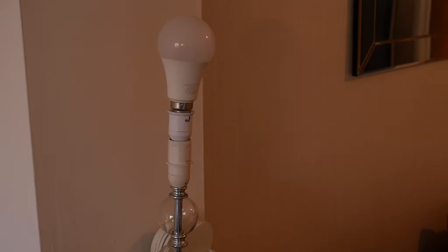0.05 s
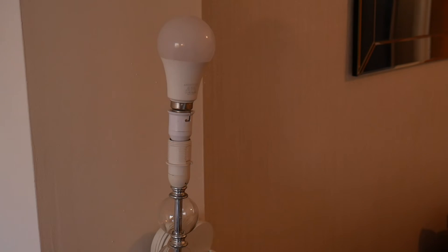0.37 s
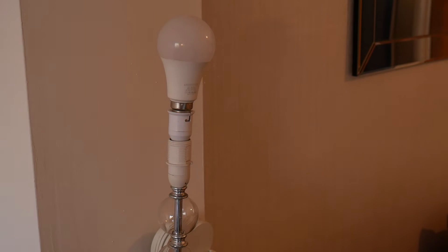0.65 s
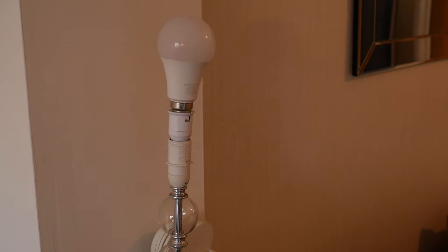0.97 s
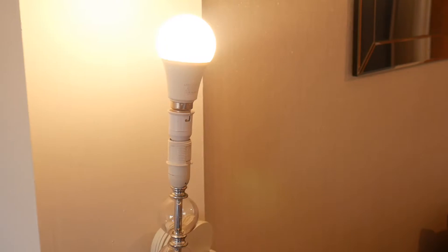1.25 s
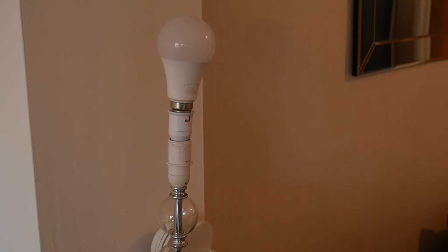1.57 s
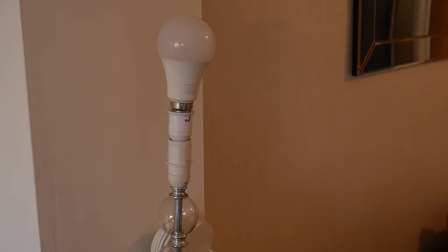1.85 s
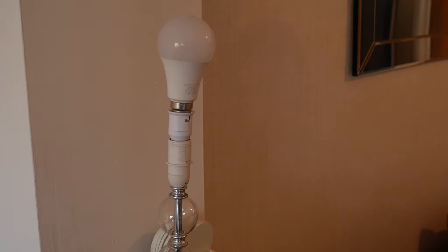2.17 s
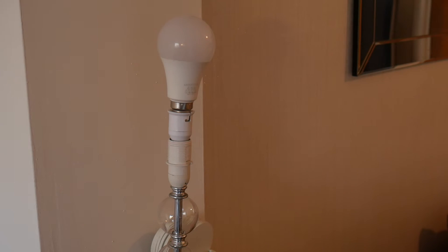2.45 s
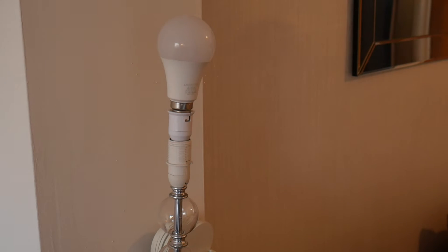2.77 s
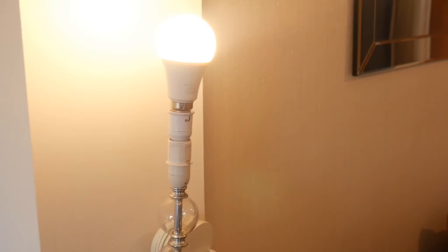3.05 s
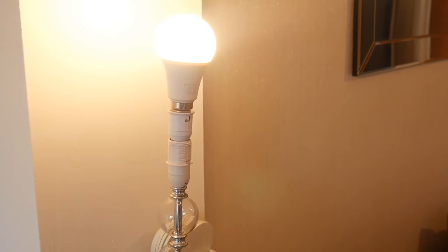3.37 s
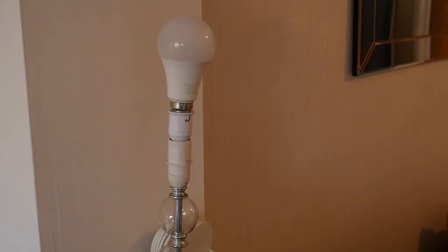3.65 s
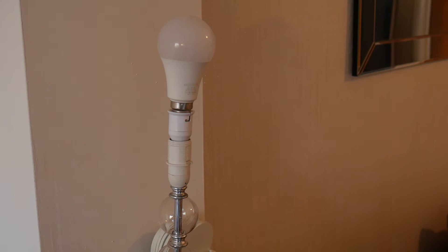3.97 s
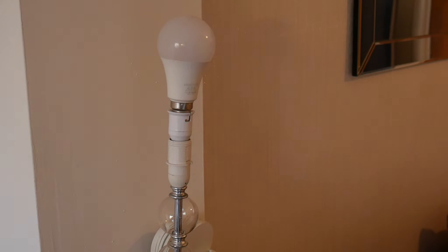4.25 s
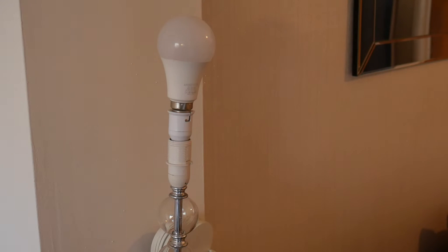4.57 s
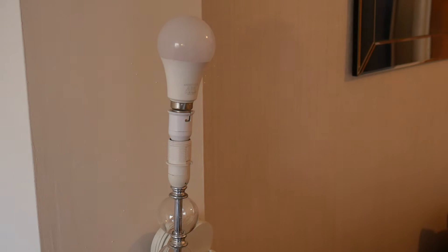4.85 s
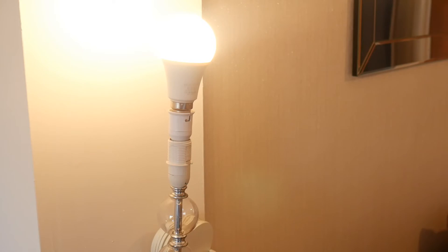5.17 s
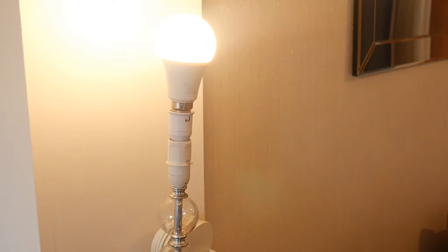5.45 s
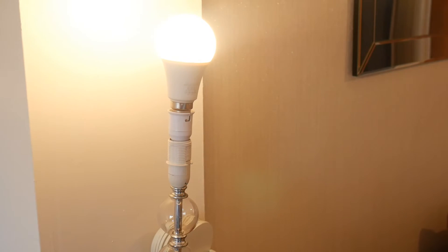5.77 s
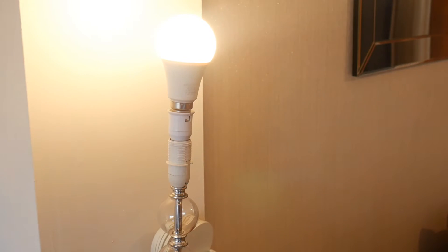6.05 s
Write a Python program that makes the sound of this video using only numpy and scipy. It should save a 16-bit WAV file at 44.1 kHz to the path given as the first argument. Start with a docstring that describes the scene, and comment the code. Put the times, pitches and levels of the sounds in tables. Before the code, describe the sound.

A plastic light switch clicks on and off five times in a bare room, with sharp snaps and a few dull wooden knocks.

```python
"""A plastic light switch is clicked on and off five times in a bare, lively room.
Each snap rings the housing and its spring, thumps as it overloads the microphone and dies away in
the room. A fingertip brushes the switch, and around each switch-off something loose and wooden
knocks and rocks to rest. Underneath lie a far clock, faint fast ticking, mains hum, a low rustle
and a hiss that swells at the end."""
import sys
import numpy as np
from scipy import signal
from scipy.fft import rfft, irfft
from scipy.io import wavfile
from scipy.ndimage import uniform_filter1d

SR = 44100
rng = np.random.default_rng(int(sys.argv[2]) if len(sys.argv) > 2 else 0)


def to_wav(s):
    """Save 16-bit WAV."""
    ch = np.atleast_2d(s).T  # columns
    pcm = np.round(np.clip(ch, -1, 1) * 32767)  # PCM
    wavfile.write(sys.argv[1], SR, pcm.astype(np.int16))


N = 269403
TIME = np.arange(N) / SR
SIZE = 2 ** 15  # samples in one hit with its tail
AGE = np.arange(SIZE) / SR
HZ = np.maximum(np.arange(SIZE // 2 + 1) * SR / SIZE, 1)


# The snaps: start_s, level_db, tilt_db_per_octave, lever_db, thump_db, wood_jolt_db, throw (on or off)
SNAPS = [(0.3379, 1.32, 0.2, -1, -2, -25.5, "on"), (1.4159, 0.6, 0.4, 0, -0.5, -19.5, "off"),
         (2.2534, 1.5, 0.0, -3, -2.5, -8.5, "on"), (3.4182, 0, 0.63, 3.5, -2.5, -4.5, "off"),
         (4.318, 0, 0.5, 4, -22.5, -13, "on")]
# Contacts inside a snap, from the spring tipping to its last bounce: offset_s, level_db, decay_s
CONTACTS = [(-0.0016, -16.5, 0.0018), (0.0, 2, 0.0014), (0.0013, 0, 0.0012), (0.0039, -7.5, 0.0015),
            (0.0055, -19, 0.0009)]
# Broad tone of the snap, per throw: pitch_hz, level_db
SNAP_COLOUR = { "on": [(100, -20), (400, -12), (950, -13), (1300, 1.5), (2200, -7.5), (3000, -0.5),
               (4200, -6), (6000, 3), (8000, 1), (10000, 4), (12000, -2), (14000, -11.5), (15500, -14)],
               "off": [(80, -13), (400, -16.5), (950, -11), (1300, -9), (2200, -2.5), (3000, 2.5),
               (4200, 3.5), (6000, 3.5), (8000, -1.5), (10000, 0.5), (12000, -5), (14000, -12),
               (15500, -16.5)]}
# Resonances of the plastic housing, per throw: pitch_hz, width_hz, boost_db
HOUSING_RESONANCES = { "on": [(1414, 170, 4.5), (1846, 310, 6), (2470, 260, 5), (3098, 220, 3),
                      (3480, 410, 8.5), (3880, 449, 7.5), (4520, 209, 6), (4890, 440, 7), (5458, 449, 2.5),
                      (6350, 180, 3), (6890, 142, 4), (7250, 100, 5), (8480, 280, 6), (9350, 310, 5),
                      (10900, 449, 3.5)], "off": [(1130, 66, 0), (1518, 350, 18.5), (3460, 550, 7),
                      (3926, 61, 1.5), (4523, 100, 3.5), (5360, 400, 4.5), (5765, 93, 4), (6200, 115, 3),
                      (6730, 490, 4.5), (7300, 197, 3.5), (7560, 130, 3), (8750, 449, 7), (9169, 155, 2.5),
                      (10900, 130, 2), (11480, 300, 1.5)]}
# Ring of the lever, per throw: pitch_hz, width_hz
LEVER_RING = {"on": (1380, 290), "off": (1560, 130)}
# Ring of the steel spring and contacts: pitch_hz, level_db, t60_s
SPRING_MODES = [(3450, 0, .3), (3770, -4.5, 0.38), (4720, -4.5, 0.33), (5700, -1.5, .4), (5700, -1, .35),
                (7060, -1, .35), (8100, -1.5, .3), (9200, 3, .3)]
# Stereo image of the snap: pitch_hz, correlation
SNAP_STEREO = [(100, -2.2), (1200, 0.3), (4500, 1), (14000, 0.75)]
# The snap sits to the left: pitch_hz, left_minus_right_db
SNAP_PAN = [(300, 3), (1300, 5), (2200, 3.5), (3300, 7.5), (4700, 3.5), (8000, 1), (13000, -0.86)]
# Dull thump of the overloaded microphones: pitch_hz, level_db
THUMP_COLOUR = [(40, -2), (120, -0.5), (280, 5.5), (650, 8.5), (1200, 0), (2400, 1), (4000, -5.5),
                (10000, -16)]
# The thump is mostly out of phase: pitch_hz, correlation
THUMP_STEREO = [(80, 0.45), (250, -1.6), (2500, -1.2)]

def switch(reverb, direct_db, room_db, spring_db):
    """The spring tips over, slams home and bounces; the housing rings differently for on and off."""
    out = np.zeros((2, N))
    lead_s = .006  # space for the contact ahead of the main hit
    pan = from_db(at_hz(SNAP_PAN, HZ) * np.array([[.5], [-.5]]))
    contact_power = 0
    for offset_s, contact_db, decay_s in CONTACTS:
        age = AGE - lead_s - offset_s
        decay = np.exp(-2 * np.clip(age / decay_s, 0, 20))
        contact_power += (age >= 0) * from_db(2 * contact_db) * decay
    for start_s, level_db, tilt, lever_db, thump_db, _, throw in SNAPS:
        resonances = [*HOUSING_RESONANCES[throw], (*LEVER_RING[throw], lever_db)]
        housing = from_db(level_db) * body(SNAP_COLOUR[throw], resonances, tilt)
        impact = irfft(rfft(crackle(np.sqrt(contact_power), SNAP_STEREO)) * pan)
        add(out, convolve(housing, impact) * from_db(direct_db), start_s - lead_s)
        add(out, convolve(housing, reverb) * from_db(room_db), start_s)
        add(out, modes(SPRING_MODES, spring_db + level_db), start_s)
        thump = convolve(body(THUMP_COLOUR), crackle(fade(0.00074), THUMP_STEREO))
        add(out, thump * from_db(thump_db), start_s)
    return out


# The hand nudges the wood: start_s, level_db
NUDGES = [(0.002, -16), (1.301, -8.5), (3.339, -12.5)]
# Let go after a switch-off, the wood rocks to rest: start_s, level_db, first_gap_s, gap_ratio
ROCKINGS = [(1.5325, 3.5, .102, .9), (3.5396, 2.5, .108, .63)]

def wood_blows(rock_count, jolt_delay_s=.016, graze_lead_s=.022, graze_db=-10, rock_loss_db=4.5):
    """Snaps jolt the wood, the hand grazes and nudges it, and it rocks ever faster and softer."""
    blows = [(start_s + jolt_delay_s, jolt_db) for start_s, *_, jolt_db, throw in SNAPS]
    for start_s, level_db in NUDGES:
        blows += [(start_s - graze_lead_s, level_db + graze_db), (start_s, level_db)]
    for start_s, level_db, gap_s, gap_ratio in ROCKINGS:
        for k in range(rock_count):
            blows.append((start_s, level_db - rock_loss_db * k ** 1.5))
            start_s += gap_s * gap_ratio ** k
    return blows


# Dull tone of a knock: pitch_hz, level_db
KNOCK_COLOUR = [(80, -35), (160, -23.5), (240, -2), (450, -6.5), (620, -3.5), (850, -10), (1150, -3),
                (1600, -18), (3000, -29.5), (8000, -55)]
# Ring of the wood: pitch_hz, level_db, t60_s
WOOD_MODES = [(226.5, 0, 0.36), (256, -3.5, .17), (340, 1, 0.41), (552, 4.5, 0.36), (586.6, -1.5, 0.47),
              (631.3, 1, 0.34), (1112, 0.5, 0.29), (1280, -2.5, 0.14)]

def wood_knocks(reverb, thud_db, ring_db, room_db, contact_s):
    """Each blow is a dull, rattly thud that sets the wood ringing and stirs the room."""
    out, wood = np.zeros((2, N)), body(KNOCK_COLOUR)
    for start_s, level_db in wood_blows(rock_count=4):
        thud = from_db(thud_db) * crackle(fade(contact_s), ROOM_STEREO)
        knock = thud + modes(WOOD_MODES, ring_db) + from_db(room_db) * reverb
        add(out, convolve(wood, knock) * from_db(level_db), start_s)
    return out


# Light touches of the finger: start_s, level_db
TOUCHES = [(0.11, 0), (1.300, -1), (2.695, 6.5), (3.313, -3.5), (4.277, 3)]
# Soft tone of a touch: pitch_hz, level_db
TOUCH_COLOUR = [(150, -13), (600, 3), (1400, -7.5), (2000, -10), (2800, 2.5), (4000, -11), (12000, -25.5)]

def finger_touches(reverb, level_db, room_db, contact_s):
    """A fingertip brushes the switch, making a short, soft scuff."""
    out, ring = np.zeros((2, N)), body(TOUCH_COLOUR)
    for start_s, touch_db in TOUCHES:
        brush = crackle(fade(contact_s), ROOM_STEREO) + from_db(room_db) * reverb
        add(out, convolve(ring, brush) * from_db(level_db + touch_db), start_s)
    return out


# Decay of the bare room: pitch_hz, t60_s
ROOM_DECAY = [(150, 0.5), (500, 0.85), (1500, 0.6421), (3000, 0.6449), (6000, 0.5681), (8500, 0.4786),
              (11000, 0.4242), (15000, 0.32)]
# Tone of the reverb: pitch_hz, level_db
ROOM_COLOUR = [(150, -1.5), (700, -0.5), (1400, -4), (2300, 1), (3200, -4), (4500, -2.5), (6200, 1.5),
               (8000, 1.5), (10300, -0.5), (12200, -5.5), (14500, -3)]
# Stereo image of the room: pitch_hz, correlation
ROOM_STEREO = [(100, 0.89), (1000, 0.32), (3000, 0.65), (7000, 0.81), (14000, 0.5)]

def room(build_s, build_depth, early_db, early_s):
    """Early wall echoes, then a diffuse tail that builds up and dies fastest in the treble."""
    centres_hz = np.geomspace(100, 16000, num=16)
    field = rfft(stereo_noise(ROOM_STEREO, SIZE)) * from_db(at_hz(ROOM_COLOUR, HZ))
    tail = 0
    for hz, band_weights in zip(centres_hz, np.eye(len(centres_hz))):
        band = irfft(field * np.interp(np.log(HZ), np.log(centres_hz), band_weights))
        tail += band * from_db(-60 * AGE / at_hz(ROOM_DECAY, hz))
    swell = 1 - build_depth * np.exp(-AGE / build_s)
    echoes = from_db(early_db) * np.exp(-AGE / early_s)
    attack = np.clip(AGE / 0.0066, 0, 1)
    return tail * (swell + echoes) * attack * np.sqrt(2 / SR)


# The clock's bright tick: pitch_hz, level_db
CLOCK_TICK_COLOUR = [(300, -7), (1400, -3), (2000, -9), (2600, -3), (3200, -1), (4000, -17), (9000, -30)]
# Its duller settling: pitch_hz, level_db
CLOCK_SETTLE_COLOUR = [(100, -11), (280, 4), (900, -7.5), (1400, -1), (2000, -15), (9000, -32)]

def far_clock(reverb, tick_db, settle_db, direct_db, first_s=0.0091, settle_s=0.15):
    """A clock across the room ticks and settles once a second, heard mostly as reverb."""
    out = np.zeros((2, N))
    path = reverb + from_db(direct_db) * crackle(fade(.008), ROOM_STEREO)
    tick = convolve(body(CLOCK_TICK_COLOUR), path) * from_db(tick_db)
    settle = convolve(body(CLOCK_SETTLE_COLOUR), path) * from_db(settle_db)
    for start_s in np.arange(first_s, N / SR, 1):
        add(out, tick, start_s)
        if start_s + settle_s < N / SR:
            add(out, settle, start_s + settle_s)
    return out


MAINS_HZ = 50
# Spells of faint, fast ticking: start_s, length_s
TICK_SPELLS = [(0, 0.14), (1.933, 0.34), (2.752, 0.19), (3.911, 0.36), (5.57, 0.5)]
# Midrange tone of those ticks: pitch_hz, level_db
TICK_COLOUR = [(150, -8), (450, 2.5), (1400, 3.5), (2600, -3.5), (3600, 3.5), (4000, -19), (9000, -36.5)]

def fast_ticking(level_db, spread_db):
    """Tiny ticks of uneven strength come in spells, at the mains rate."""
    slots = np.arange(0, N, round(SR / MAINS_HZ))
    slot_s = slots / SR
    active = np.any([(slot_s >= s) & (slot_s < s + length_s) for s, length_s in TICK_SPELLS], axis=0)
    unevenness = np.minimum(rng.standard_normal(len(slots)), 1.5)
    ticks = np.zeros(N)
    ticks[slots] = active * from_db(level_db + spread_db * unevenness)
    return signal.fftconvolve(ticks, body(TICK_COLOUR))[:N]


def mains_hum(level_db):
    """A transformer hums at twice the mains rate."""
    return np.sqrt(2) * from_db(level_db) * np.sin(2 * np.pi * 2 * MAINS_HZ * TIME)


# Tone of the low rustle: pitch_hz, level_db
RUSTLE_COLOUR = [(30, -19), (60, -7.5), (140, -5), (270, 2.5), (420, -3), (900, -9.5), (1350, -7.5),
                 (2000, -16.5), (3300, -20.5), (4500, -27), (15000, -43.5)]
# The rustle sinks once the hand is at rest: time_s, level_db
RUSTLE_LEVEL = [(0, -55), (0.7, -61), (3.0, -58), (5.0, -62), (6.1, -62.5)]
# Tone of the hiss: pitch_hz, level_db
HISS_COLOUR = [(30, 1), (500, 6), (2000, -1), (4000, -1), (7000, -4.5), (10500, -5), (15000, -10.5)]

def room_tone(hiss_db, swell_start_s, swell_db_per_s):
    """A low rustle sinks away under a hiss that swells at the end."""
    rustle_db = np.interp(TIME, *np.transpose(RUSTLE_LEVEL))
    swell_db = swell_db_per_s * np.maximum(TIME - swell_start_s, 0)
    rustle = air(RUSTLE_COLOUR, rustle_db, flutter_db=0.2)
    return rustle + air(HISS_COLOUR, hiss_db + swell_db, flutter_db=1.3)


# Stereo image of the room tone, widest in the lows: pitch_hz, correlation
AIR_STEREO = [(40, -.45), (200, -.4), (800, -.55), (1500, -0.23), (3000, .1), (6000, 0.55), (14000, 0.3)]

def air(colour, level_db, flutter_db):
    """A bed of coloured noise whose level flutters a little."""
    hz = np.maximum(np.arange(N // 2 + 1) * SR / N, 1)
    noise = irfft(rfft(stereo_noise(AIR_STEREO, N)) * from_db(at_hz(colour, hz)), N)
    flutter = np.interp(TIME, np.linspace(0, N / SR, num=150), rng.standard_normal(150))
    return noise / noise.std() * from_db(level_db + flutter_db * flutter)


def body(colour, resonances=(), tilt_db_per_octave=0):
    """The ring of a struck object with a broad tone and some resonances."""
    db = at_hz(colour, HZ) + tilt_db_per_octave * np.log2(HZ / 5000)
    for pitch_hz, width_hz, boost_db in resonances:
        db += boost_db / (1 + (2 * (HZ - pitch_hz) / width_hz) ** 2)
    # Minimum phase: nothing rings before the hit.
    cepstrum = irfft(np.log(from_db(db)))
    cepstrum[1:SIZE // 2] *= 2
    cepstrum[SIZE // 2 + 1:] = 0
    return irfft(np.exp(rfft(cepstrum)))


def modes(table, ring_db):
    """Decaying sines, each struck a little harder or softer every time."""
    ring = np.zeros((1, SIZE))
    for pitch_hz, level_db, t60_s in table:
        strike_db = ring_db + level_db + rng.normal(0, 1.5)
        ring += from_db(strike_db - 60 * AGE / t60_s) * np.sin(2 * np.pi * pitch_hz * AGE)
    return ring


def crackle(envelope, stereo):
    """A noise burst like a cluster of tiny impacts, evened out across pitch to unit energy."""
    burst = rfft(stereo_noise(stereo, SIZE) * envelope)
    power = uniform_filter1d(np.mean(np.abs(burst) ** 2, axis=0), size=400)
    return irfft(burst / np.sqrt(power + 1e-18)) * (envelope > 1e-4)


def stereo_noise(stereo, size):
    """White noise whose left-right correlation follows a table over pitch, held within +-0.99."""
    mid, side = rfft(rng.standard_normal((2, size)))
    hz = np.maximum(np.arange(len(mid)) * SR / size, 1)
    alike = np.clip(at_hz(stereo, hz), -.99, .99)
    return irfft(np.sqrt((1 + alike) / 2) * mid + np.sqrt((1 - alike) / 2) * side * [[1], [-1]], size)


def fade(decay_s):
    """Envelope of a single contact."""
    return np.exp(-np.minimum(AGE / decay_s, 20))


def from_db(db):
    """Decibels to gain."""
    return 10 ** (np.asarray(db) / 20)


def at_hz(points, hz):
    """Read a table on a log-frequency axis."""
    pitch_hz, value = np.transpose(points)
    return np.interp(np.log(hz), np.log(pitch_hz), value)


def add(out, sound, start_s):
    """Mix a sound into the stereo track."""
    start = max(round(start_s * SR), 0)
    out[:, start:start + sound.shape[1]] += sound[:, :N - start]


def convolve(a, b):
    """Pass one response through another."""
    return signal.fftconvolve(np.atleast_2d(a), np.atleast_2d(b), axes=1)[:, :SIZE]


def scene():
    """Switch, wood, finger and clock share one room, over a quiet bed."""
    reverb = room(build_s=0.086, build_depth=.7, early_db=-10.5, early_s=.025)
    clicks = switch(reverb, direct_db=10.5, room_db=24.5, spring_db=-48)
    wood = wood_knocks(reverb, thud_db=3.5, ring_db=-42.5, room_db=17.5, contact_s=0.007)
    finger = finger_touches(reverb, level_db=-23, room_db=8.5, contact_s=0.0072)
    clock = far_clock(reverb, tick_db=-5, settle_db=-8.5, direct_db=-23)
    bed = room_tone(hiss_db=-68, swell_start_s=5.5, swell_db_per_s=9.5)
    ticking = fast_ticking(level_db=-37, spread_db=4.5)
    return clicks + wood + finger + clock + ticking + mains_hum(level_db=-69.5) + bed


def record(dry):
    """Overload rounds off the loudest peaks, and a steep low-pass cuts the very top."""
    cutoff_hz = 15700
    lowpass = signal.ellip(10, .2, 80, cutoff_hz, fs=SR, output="sos")
    return signal.sosfilt(lowpass, np.tanh(dry))


dry = scene()
out = record(dry)
to_wav(out)
```